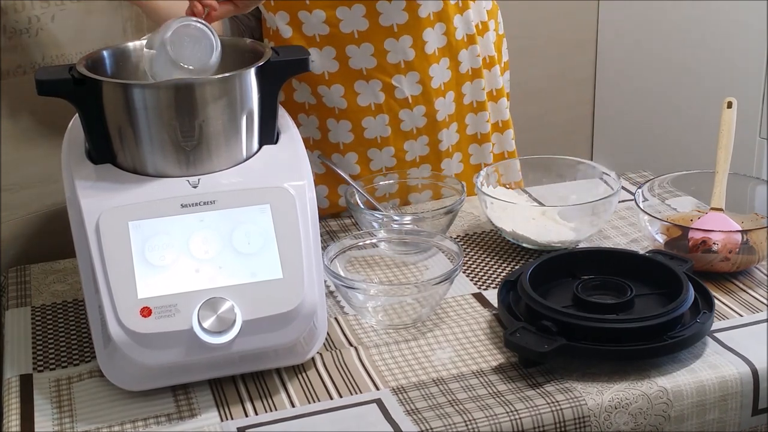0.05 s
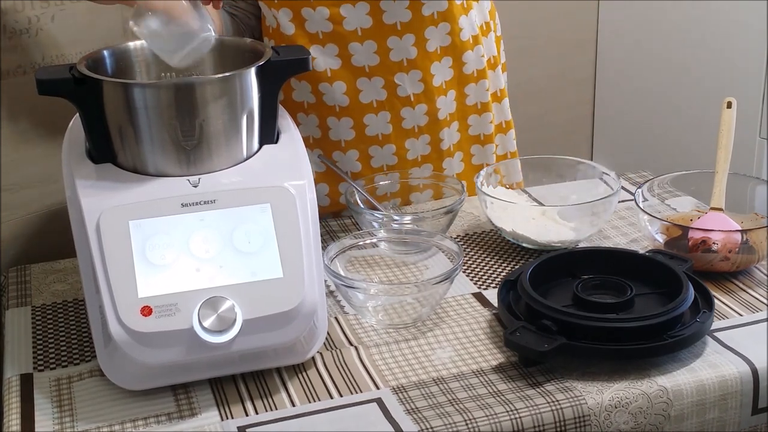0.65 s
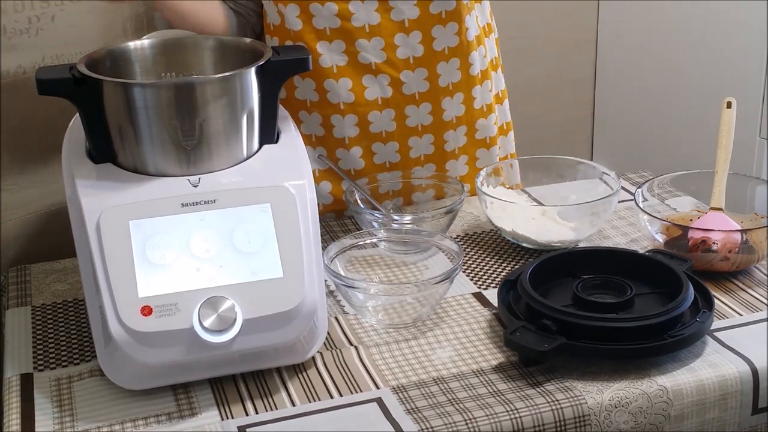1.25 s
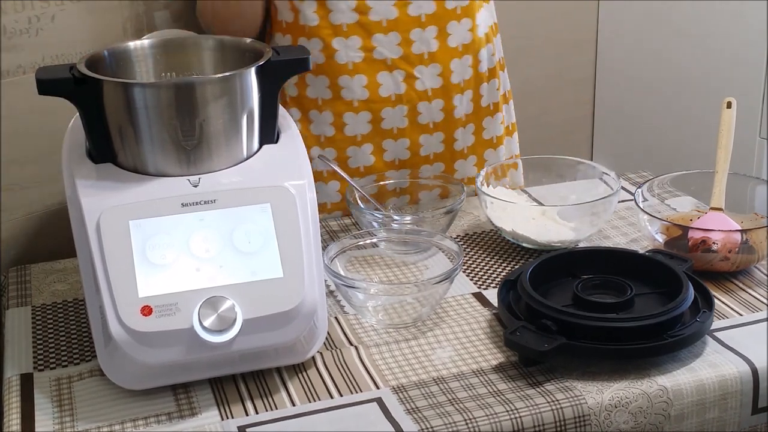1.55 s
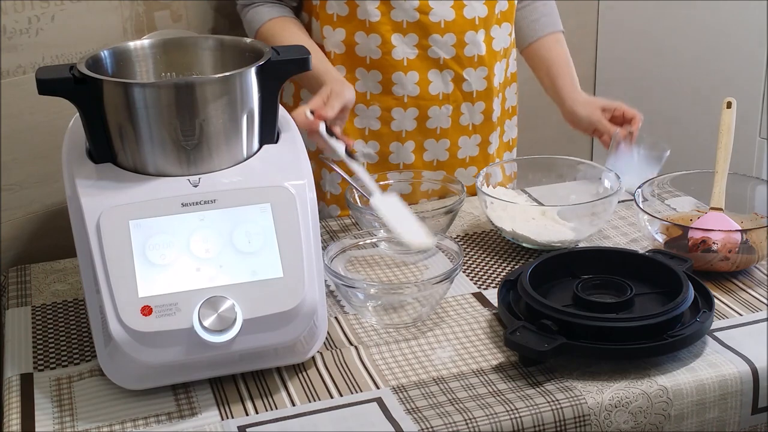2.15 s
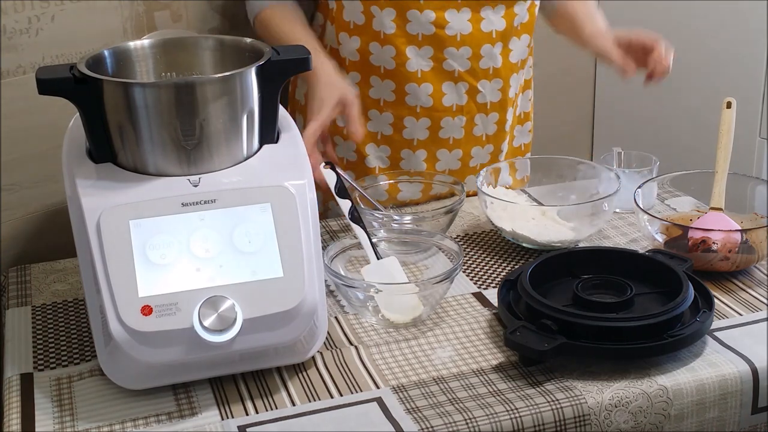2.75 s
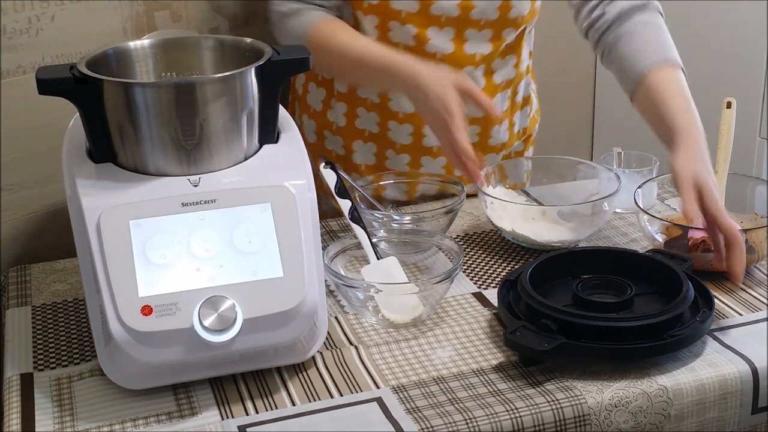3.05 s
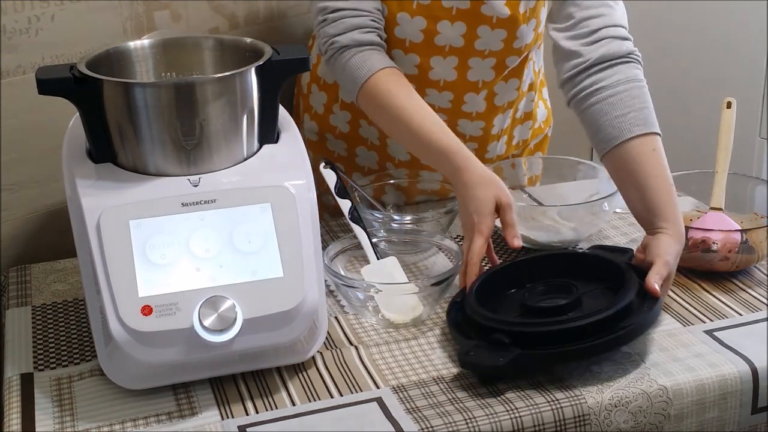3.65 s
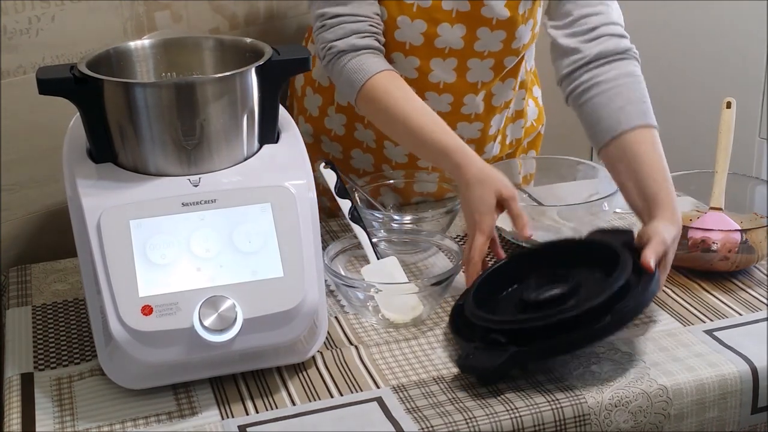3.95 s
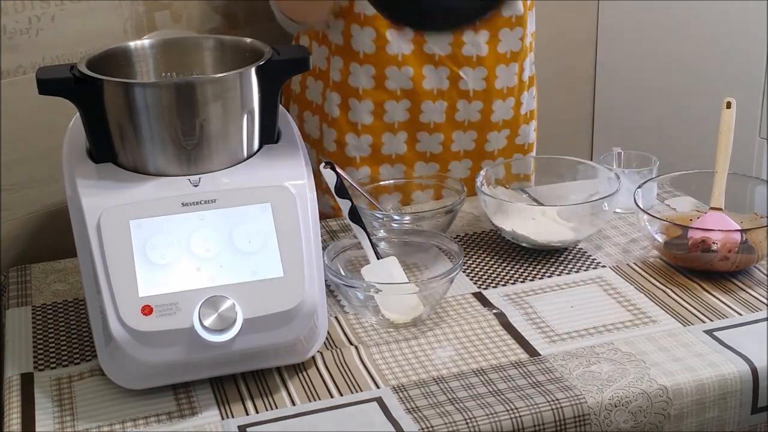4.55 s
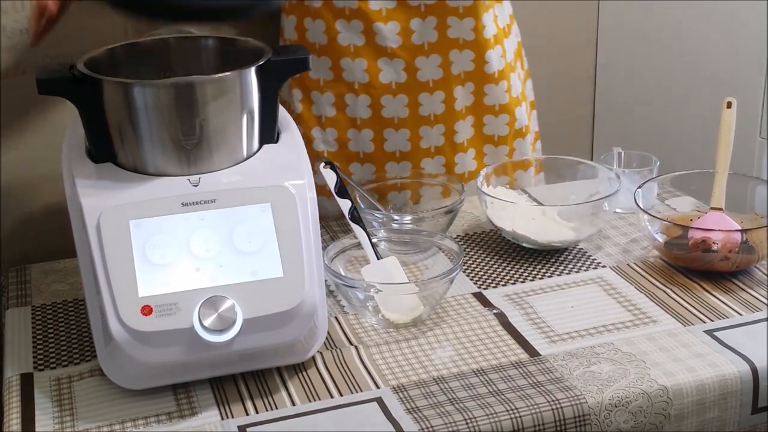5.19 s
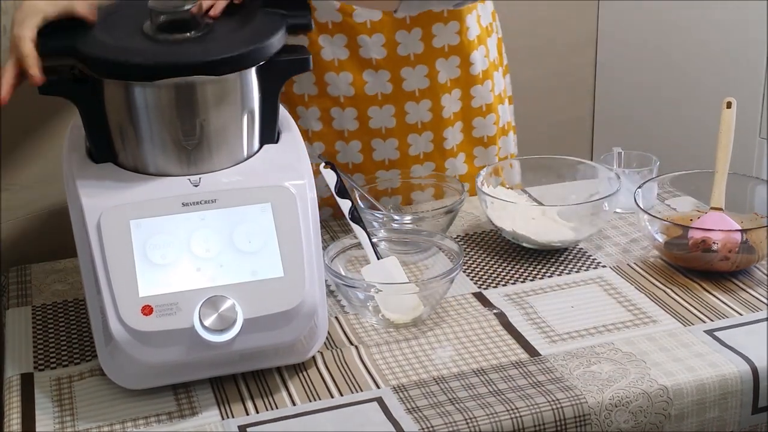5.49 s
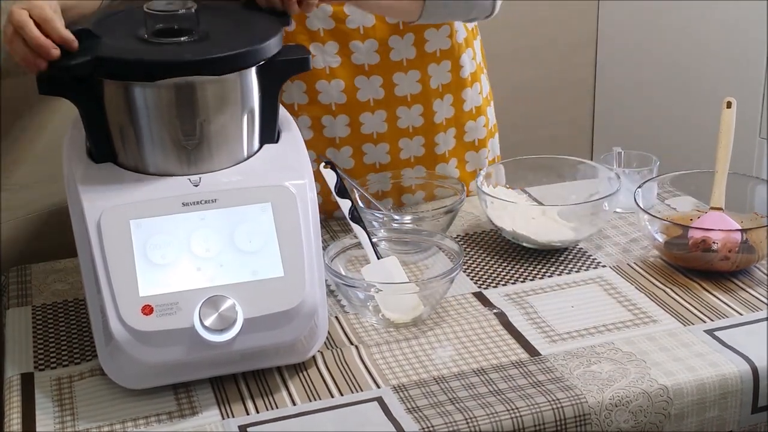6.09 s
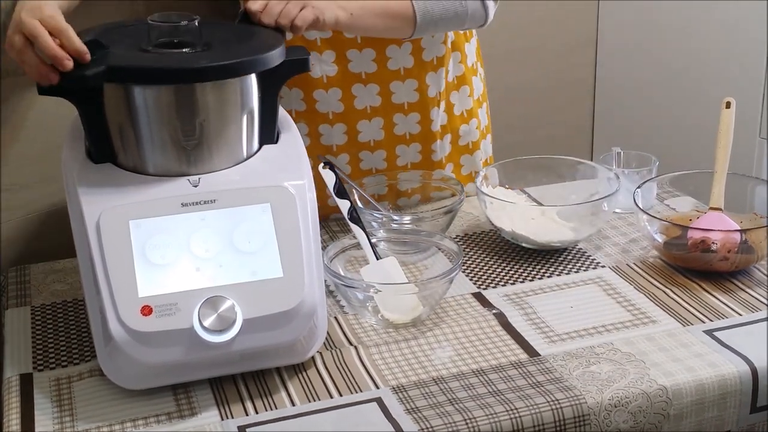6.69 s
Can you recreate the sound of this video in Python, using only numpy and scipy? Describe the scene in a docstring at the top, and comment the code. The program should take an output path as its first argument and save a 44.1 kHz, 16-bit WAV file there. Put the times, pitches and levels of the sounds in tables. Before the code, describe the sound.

A low, steady appliance hum with a faint thin whine runs throughout, in a small, hard-walled kitchen. For the first two seconds there are only very soft utensil taps and sleeve brushes. At about 2.4 seconds a cup knocks dully onto a cloth-covered table, and just after it a spatula gives a light, ringing clink on a glass bowl. From 3.3 to 4 seconds a plastic lid is nudged and lifted, making a few hollow knocks, followed by faint cloth rustling and a couple of tiny taps. At about 5.5 seconds comes the loudest part, close by: the lid lands on a food processor's steel bowl and rattles quickly, the plastic clacking and the steel ringing briefly. From 6 to 6.9 seconds it is twisted and locked, with short scrapes, more clacks and low thumps as the machine rocks, the heaviest at about 6.5 seconds.

```python
"""A plastic lid drops on the steel bowl of a food processor, rattles and is twisted until it locks:
each contact clacks the plastic, rings the steel and rocks the machine with a low thump. Before that,
a cup settles on a clothed table, a spatula clinks a glass bowl and the lid is nudged and lifted.
Sleeves brush and utensils tap softly. Underneath lies a steady appliance hum with a thin whine,
all in a small, hard-walled kitchen."""
import sys
import numpy as np
from scipy import signal
from scipy.fft import rfft, irfft, next_fast_len
from scipy.io import wavfile
from scipy.ndimage import uniform_filter1d

SR = 44100
rng = np.random.default_rng(int(sys.argv[2]) if len(sys.argv) > 2 else 0)


def int16_out(signal):
    """Quantize to a 16-bit WAV file."""
    q = np.round(np.clip(np.atleast_2d(signal).T, -1, 1) * 32767)
    wavfile.write(sys.argv[1], SR, q.astype(np.int16))


N = 305657
TIME = np.arange(N) / SR
RING_TIME = TIME[:SR]

# motor hum partials: f/Hz, level/dB, waver/dB
HUM_PARTIALS = [(96.5, -50.5, 2.8), (161.5, -80, 3.5), (214, -76.5, -1.5), (292, -66.5, 6), (399, -83, 6.5),
                (453, -79, -1), (633, -79, 1), (860, -80, 7), (2780, -91, 7.5)]
# room tone EQ: f/Hz, level/dB
AIR_EQ = [(20, -7.5), (35, -10), (60, -9), (150, -1), (300, -5), (520, -14.5), (850, -14), (1200, -21.5),
          (2000, -23.5), (5000, -27.5), (9000, -25), (11000, -28.5), (15500, -28)]
# utensils touching: t/s, level/dB
UTENSIL_TAPS = [(.722, -63), (.79, -69.5), (1.69, -66.5), (1.729, -64.5), (4.711, -60), (5.019, -65.5)]
# their EQ: f/Hz, level/dB
TAP_EQ = [(100, -22), (800, -12), (1000, -3), (1170, 3.5), (1400, -13), (2000, -9), (2600, -13),
          (3500, -18), (15000, -27)]
# sleeves, hands and lid brushing cloth and plastic: peak t/s, level/dB, length/s
BRUSH_STROKES = [(.72, -70, .2), (1.87, -70.5, .7), (3.27, -64.5, 1), (3.44, -75, 0.24),
                 (3.59, -53.5, 0.73), (4.02, -61, 0.59), (4.37, -60.5, 0.34), (4.68, -60, 0.67),
                 (4.85, -61, .5), (4.975, -57, 0.2), (5.115, -55.5, .25), (5.3, -61, 0.33),
                 (5.988, -53, 0.24), (6.13, -55.5, 0.29), (6.255, -47.5, 0.19), (6.87, -48, 0.083)]
# brushed cloth EQ: f/Hz, level/dB
CLOTH_EQ = [(200, 6), (1000, 0.5), (2500, 3), (5000, 0), (8500, 0.5), (11000, -7), (15000, -10)]
# lid rim pushed round on the steel: peak t/s, level/dB, length/s
RIM_SCRAPES = [(5.73, -39.5, 0.3), (6.01, -51, .4), (6.245, -31, 0.071), (6.42, -48, 0.14),
               (6.66, -66, 0.31), (6.8, -39, 0.33), (6.9, -39, .18)]
# spatula handle on the glass rim: t/s, level/dB, table thump/dB
SPATULA_HITS = [(2.572, -41.5, -44)]
# glass bowl modes: f/Hz, level/dB, t60/s
GLASS_MODES = [(1685, 2, .38), (1738, -4, .2), (3040, -4, .28), (3079, -2, .34), (4694, -1, .35),
               (4722, -6, .22), (5055, -14, .18), (6675, 6, .11), (8603, -1, .08), (8995, -3, .11),
               (9706, -15, .12), (11450, -13, .08), (14250, -16, .06)]
# spatula tick EQ: f/Hz, level/dB
TICK_EQ = [(40, -19), (300, 3), (1100, -6), (1700, 4), (2300, -11), (3100, -0.5), (3800, -16),
           (4800, -8), (7500, -30), (14000, -34)]
# cup rocking to rest on the cloth: t/s, level/dB, table thump/dB
CUP_KNOCKS = [(2.3986, -27, -39.5), (2.422, -42.5, -35), (2.432, -34, -54), (2.453, -34, -58)]
# cup EQ: f/Hz, level/dB
CUP_EQ = [(30, -31), (100, -22), (240, -15.5), (365, 6.5), (470, 1.5), (620, 6.5), (780, -4.5), (1000, -3),
          (1400, -17), (2400, -35), (6000, -46), (15000, -56)]
# lid nudged on the table: t/s, level/dB, tilt/(dB per octave), table thump/dB
NUDGES = [(3.352, -49.5, -3, -53), (3.536, -44.5, -11.5, -29), (3.555, -35.5, -2, -50), (3.6, -63, -3, -39),
          (3.642, -45, 1, -38.5), (3.863, -45, 2, -47.5), (3.934, -46.5, -1.5, -64),
          (4.006, -59.5, 11, -62)]
# their EQ: f/Hz, level/dB
NUDGE_EQ = [(30, -41), (100, 2), (280, 4), (450, 0.5), (700, 3.5), (950, -0.5), (1200, 3.5), (1500, 3.5),
            (1900, -8.5), (3500, -18.5), (8000, -31), (15000, -51)]
# lid knocking on the steel bowl: t/s, level/dB, tilt/(dB per octave), machine thump/dB
LID_KNOCKS = [(5.471, -28.5, -2, -30.5), (5.494, -43, -1, -36), (5.534, -46.5, 4, -32),
              (5.604, -37, 2, -40), (5.629, -22.5, 1, -39), (6.000, -55.5, 11, -37.5),
              (6.103, -46, -19, -31.5), (6.230, -36.5, -9.5, -33), (6.253, -41, 4, -21),
              (6.394, -40, -8, -36), (6.503, -44, -2, -36), (6.541, -28, 1, -15.5),
              (6.548, -35.5, -2.5, -47), (6.737, -37, -0.5, -24.5), (6.746, -34, 0, -28.5),
              (6.777, -42, -1.5, -44), (6.866, -35, -2.5, -31), (6.885, -38, -5, -27.5)]
# dense, short ring of the plastic: f/Hz, level/dB
PLASTIC_EQ = [(30, -60), (90, -49), (180, 9), (350, 7.5), (520, 0), (900, 3.5), (1250, 0), (1700, -2),
              (2600, -6.5), (4400, -16), (7200, -20.5), (9500, -29), (12000, -36), (15500, -45)]
# steel bowl modes, undamped by the lid: f/Hz, level/dB, t60/s
STEEL_MODES = [(250, -8, 0.38), (293.3, 3.5, 0.29), (350, -36, 0.1), (435.7, -10, 0.3), (556, -35, 0.22),
               (646.6, -13.5, 0.17), (854, -18.5, 0.21), (1136, -12.5, 0.18), (1667, -33, 0.22),
               (2300, -23, 0.34), (3410, -45, 0.49)]
# steel ring EQ, deep bass cut: f/Hz, level/dB
STEEL_EQ = [(30, -26), (150, 1)]
# hard lid edge snapping on the steel rim: t/s, level/dB
EDGE_SNAPS = [(5.4712, -37), (5.626, -41.5), (6.5395, -43.5)]
# their EQ: f/Hz, level/dB
SNAP_EQ = [(1000, -31), (2600, -19), (3500, 4), (4300, -9.5), (6500, 0.5), (9000, -3.5),
           (11500, -14), (15500, -21)]
# lid flexing with a short hollow note: t/s, f/Hz, level/dB
FLEX_NOTES = [(3.537, 292.2, -31.5), (5.492, 367, -29.5), (6.106, 383, -36.5)]
# left channel against the right: f/Hz, level/dB
LEFT_EQ = [(60, -3), (200, -4.5), (700, -2), (2400, -2.5), (8000, 1.5), (15000, -2.5)]


def amp(db):
    """Decibels to gain."""
    return 10 ** (np.asarray(db) / 20)


def unit(x):
    """Scale to rms 1."""
    return x / np.sqrt(np.mean(x ** 2))


def eq_gain(hz, curve):
    """Gain of an EQ curve at each frequency."""
    f, db = np.transpose(curve)
    return amp(np.interp(np.log(hz + 1), np.log(f), db))


def eq(x, curve):
    """Colour a sound with an EQ curve."""
    n = x.shape[-1]
    size = next_fast_len(n)
    return irfft(rfft(x, size) * eq_gain(np.fft.rfftfreq(size, 1 / SR), curve), size)[..., :n]


def add(track, s, sound):
    """Mix a sound in at s seconds."""
    i = int(s * SR)
    track[..., i:i + sound.shape[-1]] += sound[..., :N - i]


def drift(rate_hz):
    """Smooth random modulation with a spread near 1."""
    k = max(int(SR / rate_hz), 1)
    return 1.34 * uniform_filter1d(np.repeat(rng.standard_normal(N // k + 1), k), k)[:N]


def fade(t60):
    """Decay by 60 dB in t60 seconds."""
    return np.exp(-np.log(1000) * RING_TIME / t60)


def stereo(x, lag_samples=4):
    """Direct sound arrives on the left just before the right."""
    return np.array([x, np.concatenate([np.zeros(lag_samples), x[:-lag_samples]])])


def diffuse(size, alike_hz=750):
    """Noise from all sides: centred in the bass, wide in the treble."""
    n = next_fast_len(size)
    likeness = .92 / (1 + (np.fft.rfftfreq(n, 1 / SR) / alike_hz) ** 4)
    mid, side = rfft(rng.standard_normal((2, n)))
    mid, side = mid * np.sqrt(1 + likeness), side * np.sqrt(1 - likeness)
    return unit(irfft(np.array([mid + side, mid - side]), n)[:, :size])


def kitchen_reverb(t60_low=0.6, t60_high=0.37, build_s=0.00053):
    """Hard walls return a flat-toned tail, built in half octaves; the treble dies a little sooner."""
    hz = np.fft.rfftfreq(SR, 1 / SR)
    half_octaves = np.clip(2 * np.log2((hz + 1) / 100), 0, 14)
    noise, reverb = rfft(diffuse(SR)), 0
    attack = 1 - np.exp(-RING_TIME / build_s)
    for k, t60 in enumerate(np.linspace(t60_low, t60_high, 15)):
        band = np.maximum(1 - abs(half_octaves - k), 0)
        tail = irfft(noise * band, SR) * fade(t60) * attack
        reverb = reverb + tail * np.sqrt(np.mean(band ** 2) / np.sum(tail ** 2) * 2)
    return reverb


def in_room(x, wet_db):
    """Direct sound plus reverb; each spot in the room has its own reflections."""
    wet = amp(wet_db)
    reverb = signal.fftconvolve(x[None], kitchen_reverb(), axes=1)[:, :N]
    return (stereo(x) + wet * reverb) / np.hypot(1, wet)


def ring(modes, scatter_db=0):
    """Struck modes; the striking point scatters their balance."""
    out = 0
    for k, (hz, db, t60) in enumerate(modes):
        gain = (-1) ** k * amp(db + scatter_db * rng.standard_normal())
        out = out + gain * np.sin(2 * np.pi * hz * RING_TIME) * fade(t60)
    return out


def clack(curve, t60, chatter, tilt_db=0, evenness=0.68):
    """A sharp contact and a spray of tiny rebounds, coloured by the part; tilt_db brightens or dulls."""
    hz = np.fft.rfftfreq(SR, 1 / SR)
    force = rng.standard_normal(SR) * fade(t60)
    force *= chatter / np.linalg.norm(force)
    force[0] += 1
    spectrum = rfft(force)
    tilt = amp(tilt_db * np.log2(np.maximum(hz / 1000, .5)))
    gain = eq_gain(hz, curve) * tilt / abs(spectrum) ** evenness  # the spray of rebounds leaves the tone smooth
    # minimum phase keeps the attack sharp
    cepstrum = irfft(np.log(gain), SR)
    cepstrum[1:SR // 2] *= 2
    cepstrum[SR // 2 + 1:] = 0
    sound = irfft(spectrum * np.exp(rfft(cepstrum)), SR)
    return sound * np.sqrt(.03 * SR / np.sum(sound ** 2))


def thump(hz, swell_s, tail_db, tail_hz, tail_t60):
    """A heavy body rocks for a few cycles and leaves a low room resonance ringing."""
    age = RING_TIME / swell_s
    rock = age ** 2 * np.exp(2 * (1 - age)) * np.sin(2 * np.pi * hz * RING_TIME)
    tail = (1 - np.exp(-age)) * fade(tail_t60) * np.sin(2 * np.pi * tail_hz * RING_TIME)
    return rock + amp(tail_db) * tail


def appliance_bed(whine_hz=6570, jitter_hz=8):
    """A motor hums with wavering overtones; electronics add a thin whine over the room tone."""
    hum = 0
    for hz, db, waver_db in HUM_PARTIALS:
        gain = np.sqrt(2) * amp(db + waver_db * np.tanh(drift(6)))
        hum = hum + gain * np.sin(2 * np.pi * hz * TIME + 0.2 * waver_db * drift(2.16))
    whine = np.sqrt(2) * np.sin(2 * np.pi * np.cumsum(whine_hz + jitter_hz * drift(60)) / SR)
    panned_left = amp([[-79.5], [-91]])
    air = unit(eq(diffuse(N), AIR_EQ)) * amp(0.8 * drift(3))
    return stereo(hum) + panned_left * whine + amp(-62) * air


def utensils():
    """Small things touch each other softly as they are picked up."""
    taps = np.zeros(N)
    for s, db in UTENSIL_TAPS:
        add(taps, s, amp(db) * clack(TAP_EQ, t60=0.064, chatter=1.8))
    return in_room(taps, wet_db=8)


def strokes(rows, rise_share, depth_db=18.5):
    """Envelope of hand strokes that speed up and slow down; both ends lie depth_db under the peak."""
    power = 0
    for s, db, length in rows:
        from_peak = np.maximum((s - TIME) / rise_share, (TIME - s) / (1 - rise_share)) / length
        power = power + amp(db - depth_db * np.minimum(from_peak, 10)) ** 2
    return np.sqrt(power)


def rubbing(grain_db=6, grip_db=3):
    """Dense tiny slips: cloth brushes smoothly, the lid rim catches and lets go."""
    cloth = eq(rng.standard_normal(N), CLOTH_EQ) * amp(0.65 * drift(25))
    slips = rng.standard_normal(N) * amp(grain_db * drift(700) + grip_db * drift(45))
    brushes = unit(cloth) * strokes(BRUSH_STROKES, rise_share=0.53)
    scrapes = unit(eq(slips, PLASTIC_EQ)) * strokes(RIM_SCRAPES, rise_share=0.59)
    return in_room(brushes + scrapes, wet_db=5)


def shimmer(modes, wet_db):
    """Each mode beats with its own reflections, so it swells and flutters as it dies."""
    reverb, out = kitchen_reverb(), np.zeros((2, SR))
    for mode in modes:
        tone = ring([mode])
        heard = stereo(tone) + amp(wet_db) * signal.fftconvolve(tone[None], reverb, axes=1)[:, :SR]
        out += heard * np.std(tone) / np.std(heard)
    return out


def glass_clink():
    """The spatula handle ticks on the rim, the glass bowl rings and its foot bumps the table."""
    glass, tick, table = np.zeros((2, N)), np.zeros(N), np.zeros(N)
    bowl = shimmer(GLASS_MODES, wet_db=7)
    bump = thump(hz=149, swell_s=0.038, tail_db=-15, tail_hz=153, tail_t60=0.6)
    for s, db, thump_db in SPATULA_HITS:
        add(glass, s, amp(db) * bowl)
        add(tick, s, amp(db + 3.5) * clack(TICK_EQ, t60=0.023, chatter=0.83))
        add(table, s, amp(thump_db) * bump)
    return glass + in_room(tick, wet_db=11) + in_room(table, wet_db=-8)


def table_knocks():
    """The cup and the lid knock through the cloth, and the table booms under them."""
    cup, lid, table = np.zeros((3, N))
    boom = thump(hz=140, swell_s=0.021, tail_db=-27, tail_hz=143, tail_t60=0.59)
    for s, db, thump_db in CUP_KNOCKS:
        add(cup, s, amp(db) * clack(CUP_EQ, t60=0.028, chatter=1.0))
        add(table, s, amp(thump_db) * boom)
    for s, db, tilt_db, thump_db in NUDGES:
        add(lid, s, amp(db) * clack(NUDGE_EQ, t60=0.057, chatter=1.23, tilt_db=tilt_db))
        add(table, s, amp(thump_db) * boom)
    return in_room(cup, wet_db=5) + in_room(lid, wet_db=13) + in_room(table, wet_db=-8.5)


def lid_rattle(start_s=5.635, count=5, swings=6, first_db=-27, loss_db=1.2, tilt_db=0.5, thump_db=-32):
    """Rows of fading knocks: the rim throws the lid back every few swings of its strongest mode."""
    bowl_hz = max(STEEL_MODES, key=lambda mode: mode[1])[0]
    return [(start_s + k * swings / bowl_hz, first_db - k * loss_db, tilt_db, thump_db)
            for k in range(count)]


def lid_on_bowl(seated_s=5.9):
    """Each contact clacks the plastic, rings the steel bowl and rocks the machine."""
    plastic, edge, steel, body = np.zeros((4, N))
    rocking = thump(hz=142, swell_s=.014, tail_db=-21, tail_hz=151, tail_t60=.4)
    damping = fade(t60=0.62)  # the lid lying on the rim shortens every ring
    for s, db, tilt_db, thump_db in LID_KNOCKS + lid_rattle():
        ring_db = db + (1 if s < seated_s else -4)  # softer once the lid is pressed home
        add(plastic, s, amp(db) * clack(PLASTIC_EQ, t60=0.043, chatter=3.84, tilt_db=tilt_db))
        add(steel, s, amp(ring_db) * ring(STEEL_MODES, scatter_db=4) * damping)
        add(body, s, amp(thump_db) * rocking)
    for s, db in EDGE_SNAPS:
        add(edge, s, amp(db) * clack(SNAP_EQ, t60=0.039, chatter=2.2))
    soft_attack = 1 - fade(t60=0.0078)
    for s, hz, db in FLEX_NOTES:
        add(body, s, ring([(hz, db, .36)]) * soft_attack)
    return (in_room(plastic, wet_db=11.5) + in_room(edge, wet_db=5.5)
            + in_room(eq(steel, STEEL_EQ), wet_db=-11.5) + in_room(body, wet_db=-2))


def scene():
    """The lid up front, then the smaller handling sounds and the bed of hum, in stereo."""
    mix = lid_on_bowl() + table_knocks() + glass_clink() + rubbing() + appliance_bed() + utensils()
    return amp(0.12) * mix


def record(dry, top_hz=15450):
    """Master EQ: the left side is a little thinner in the bass, and a steep low-pass cuts the top."""
    pair = np.array([eq(dry[0], LEFT_EQ), dry[1]])
    return signal.sosfilt(signal.ellip(10, .2, 80, top_hz, fs=SR, output="sos"), pair)


dry = scene()
out = record(dry)
int16_out(out)
```